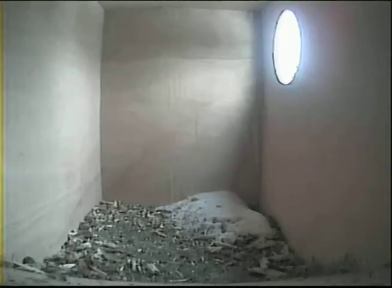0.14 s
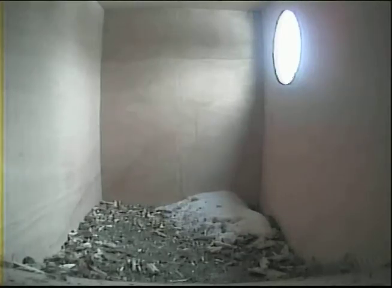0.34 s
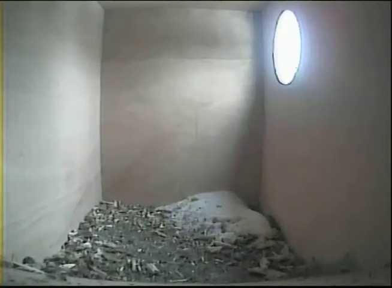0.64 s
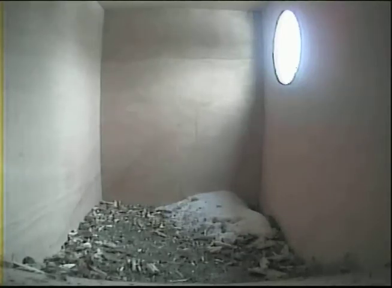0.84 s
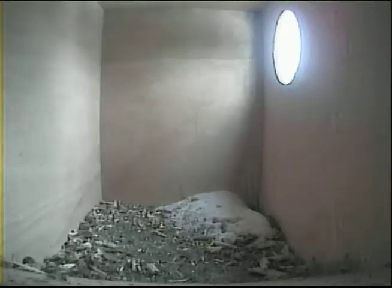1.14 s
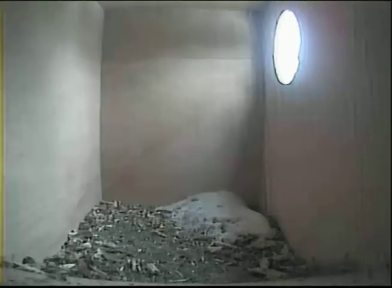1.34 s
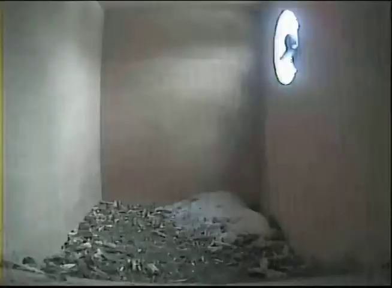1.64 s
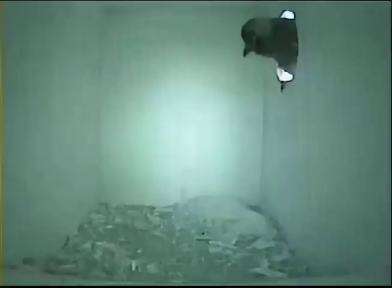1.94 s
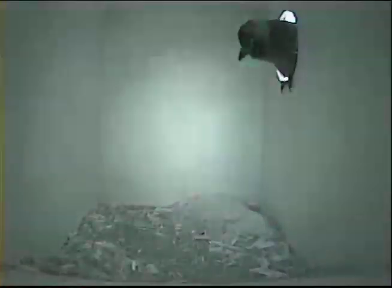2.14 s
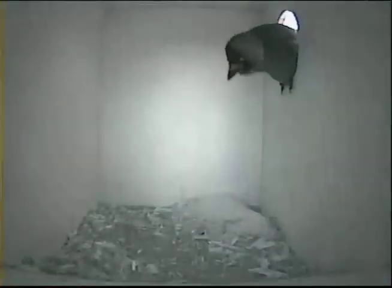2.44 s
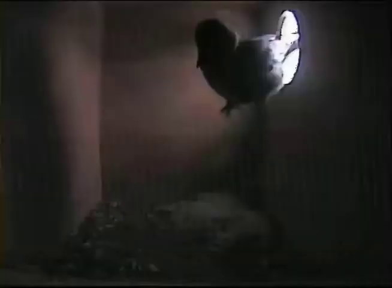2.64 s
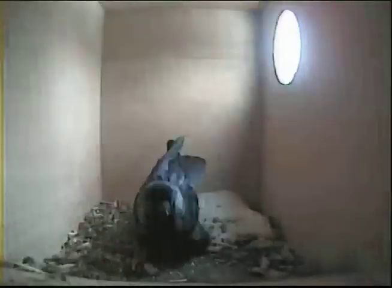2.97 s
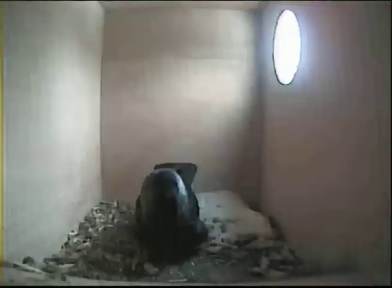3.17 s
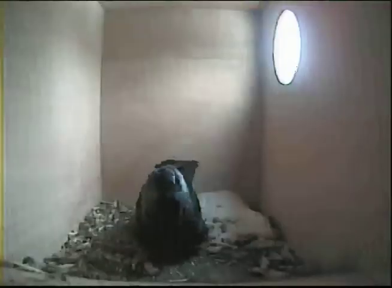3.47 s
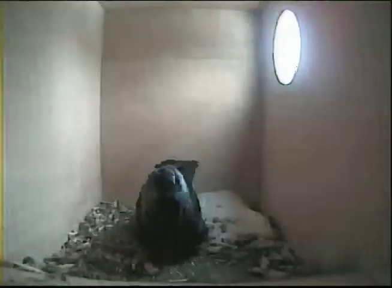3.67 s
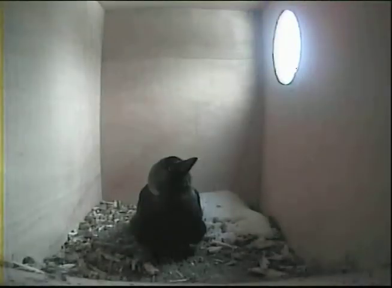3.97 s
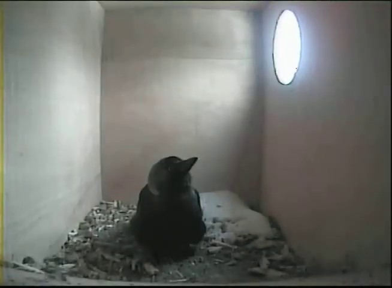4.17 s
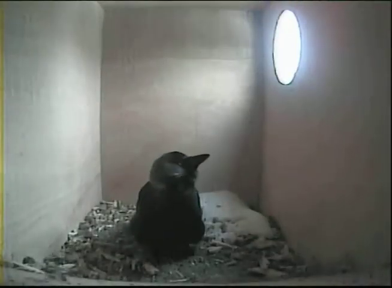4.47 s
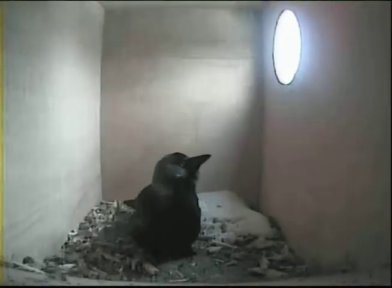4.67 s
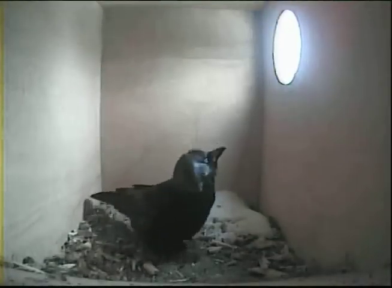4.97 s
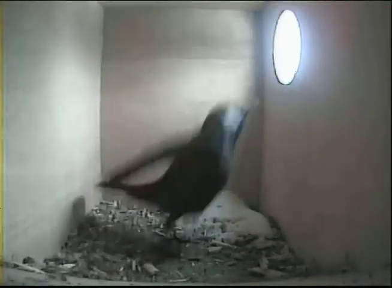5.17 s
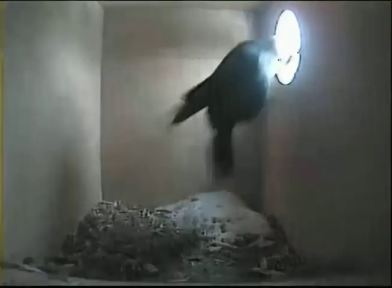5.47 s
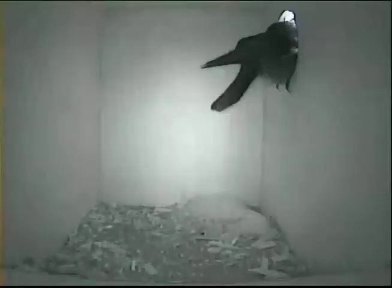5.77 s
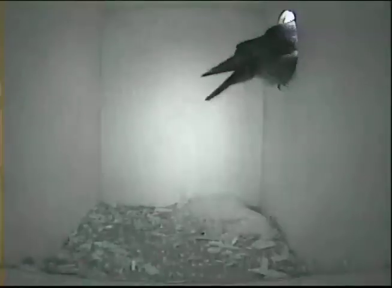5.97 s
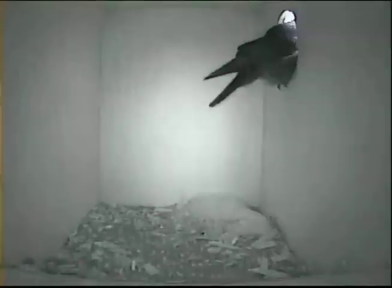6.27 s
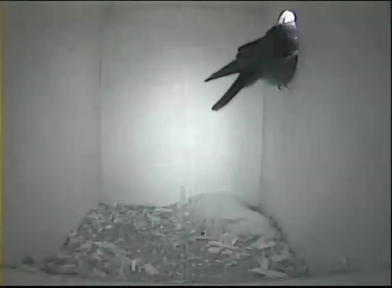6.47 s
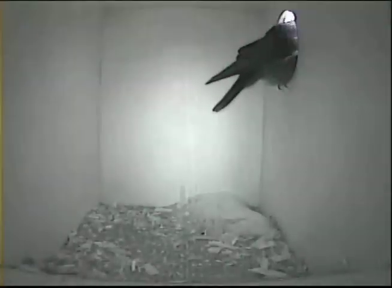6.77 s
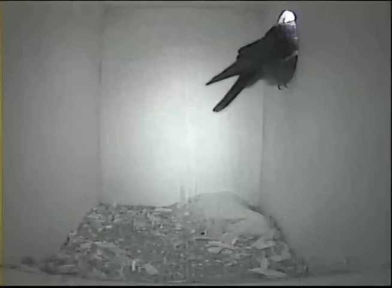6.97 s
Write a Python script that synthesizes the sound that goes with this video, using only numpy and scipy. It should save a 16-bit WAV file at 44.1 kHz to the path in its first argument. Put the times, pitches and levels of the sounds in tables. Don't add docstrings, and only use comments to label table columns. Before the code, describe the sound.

Close, low-fidelity sound in a small hollow box with hiss, faint hum and low airy pulses. One bright falling bird call comes early, then claw clicks, light knocks and litter rustle as a jackdaw climbs in and lands heavily. After an abrupt silent dropout, feet shift, wings and claws slam the boards, claws catch at the entrance, and the bird rasps once and mutters twice before settling into quiet.

```python
import sys
import numpy as np
from scipy import signal
from scipy.fft import rfft, irfft, next_fast_len
from scipy.io import wavfile
from scipy.ndimage import map_coordinates

SR = 44100
rng = np.random.default_rng(int(sys.argv[2]) if len(sys.argv) > 2 else 0)


def boost_factor(decibels):
    exponent = np.asarray(decibels, float) / 20
    return 10 ** exponent


def inscribe(sig):
    pcm = np.round(np.clip(np.atleast_2d(sig).T, -1, 1) * 32767)
    wavfile.write(sys.argv[1], SR, pcm.astype(np.int16))


N = 313551
T = np.arange(N) / SR


def unit(x):
    return x / np.sqrt(np.mean(x ** 2) + 1e-20)


def along(points, hz):
    f, v = np.transpose(points)
    return np.interp(np.log(hz + 1), np.log(f + 1), v)


def curves(rows, t=T):
    s, *columns = np.transpose(rows)
    return [np.interp(t, s, column) for column in columns]


def wobble(rate):
    knots = rng.standard_normal(int(N * rate / SR) + 4)
    return map_coordinates(knots, [T * rate])


def filtered(x, response):
    m = next_fast_len(N + SR // 2)
    return irfft(rfft(x, m) * response(np.fft.rfftfreq(m, 1 / SR)), m)[:N]


def tinted(x, spectrum):
    hz = np.fft.rfftfreq(8192, 1 / SR)[1:]
    white_rms = np.sqrt(np.mean(boost_factor(along(spectrum, hz)) ** 2))
    return filtered(x, lambda f: boost_factor(along(spectrum, f))) / white_rms


def ringing(x, modes):
    power = sum(boost_factor(2 * db) * width * np.pi / SR for _, width, db in modes)

    def response(f):
        total = 0
        for k, (centre, width, db) in enumerate(modes):
            damping = 1j * f * width
            total = total + (-1) ** k * boost_factor(db) * damping / (centre * centre - f * f + damping)
        return total

    return filtered(x, response) / np.sqrt(power)


def grit(lump_db):
    lumps = boost_factor(lump_db * np.clip(wobble(160), -2, 2))
    return unit(lumps * rng.standard_normal(N))


def swells(events, rest_db, rise, fall):
    power = boost_factor(2 * rest_db)
    for s, db, hold in events:
        early, late = np.clip(s - T, 0, None), np.clip(T - s - hold, 0, None)
        power = power + boost_factor(2 * (db - rise * early - fall * late))
    return np.sqrt(power)


# (frequency [Hz], time to fall 60 dB [s])
BOX_DECAY = [(500, 0.034), (1000, 0.14), (2050, 0.17), (3000, 0.13), (4500, 0.13), (8000, 0.091)]


def echo(x, stretch):
    hz, t, z = signal.stft(rng.standard_normal(SR // 2), SR, nperseg=128)
    decay_s = stretch * along(BOX_DECAY, hz)
    tail = signal.istft(z * boost_factor(-60 * t / decay_s[:, None]), SR, nperseg=128)[1]
    return signal.fftconvolve(x, tail / np.linalg.norm(tail))[:N]


# (frequency [Hz], density [dB per Hz])
HISS_COLOUR = [(41, -31.5), (70, 2), (81, -12), (153, -17), (173, -31.5), (253, -13), (304, -27.5),
               (482, -18.5), (707, -40.5), (847, -23), (955, -35.5), (6850, -37), (8550, -57), (11100, -77),
               (18800, -120)]
# (frequency [Hz], level [dB])
HUM_TONES = [
    (150.5, -85.5),
]


def microphone_noise():
    hum = sum(boost_factor(db + 2.5) * np.sin(2 * np.pi * hz * T) for hz, db in HUM_TONES)
    hiss = boost_factor(-76.5) * tinted(rng.standard_normal(N), HISS_COLOUR)
    return hiss + hum + .0012


# (time [s], level [dB], hold [s])
AIR_NOTES = [(.6, -59, 0.033), (.98, -58, 0.041), (1.28, -56.5, 0.034), (1.75, -58.5, .1),
             (2.05, -64, 0.16), (2.47, -58.5, .02), (2.675, -52, 0.26), (3.87, -58, 0.011),
             (4.09, -65, 0.032), (4.635, -41, 0.025), (4.74, -46.5, 0.18), (5.45, -54, 0.017),
             (5.9, -57, 0.022)]
# (time [s], level [dB], hold [s])
AIR_PUSHES = [(1.74, -49, 0.006), (1.975, -48.5, 0.0054), (2.17, -62, .005), (2.43, -63, 0.026),
              (2.67, -49, 0.0042), (4.37, -64, .005), (4.59, -49, 0.046), (5.3, -60, 0.16),
              (5.48, -52, .01), (5.91, -47, 0.0048), (6.26, -56, 0.016), (6.66, -64, 0.015),
              (7.08, -67, 0.025)]


def box_breath():
    note_hz = 53.8 * (1 + .025 * wobble(9))
    push_hz = 35 * (1 + .16 * wobble(9))
    note = np.sqrt(2) * np.sin(2 * np.pi * np.cumsum(note_hz) / SR)
    push = np.sqrt(2) * np.sin(2 * np.pi * np.cumsum(push_hz) / SR)
    note_gain = boost_factor(0.75 * wobble(22) + 2.3 * wobble(6)) * swells(AIR_NOTES, -68.5, rise=430, fall=70)
    push_gain = boost_factor(1.4 * wobble(43)) * swells(AIR_PUSHES, -68, rise=180, fall=160)
    return note_gain * note + push_gain * push


# (time [s], level [dB])
BUSTLE = [(0, -85.5), (1.0, -86.5), (1.12, -78.5), (1.56, -81), (1.7, -69), (2.11, -70.5), (2.49, -71),
          (2.63, -79.5), (3.0, -73.5), (3.9, -75), (4.43, -78), (4.6, -59), (4.74, -51.5), (5.29, -72.5),
          (5.85, -63.5), (6.15, -75.5), (6.6, -86.5), (7.1, -80.5)]
# (frequency [Hz], width [Hz], level [dB])
WALL_MODES = [(105, 29, -15.5), (218.8, 31, -6.5), (261, 18, 2), (353.5, 30, -11), (406.8, 25, -9),
              (467.2, 22, -2.5), (618.7, 20, -7.5)]
# (frequency [Hz], width [Hz], level [dB])
BOARD_MODES = [(752.6, 89, -0.5), (984, 60, 1), (1116, 60, -3), (1359, 93, -4.5), (1603, 100, -8.5)]
# (frequency [Hz], density [dB per Hz])
CLAW_COLOUR = [(900, -29), (1500, -8), (2100, -3), (2700, -4.5), (3300, -11.5), (4200, -17), (8000, -65)]
# (frequency [Hz], density [dB per Hz])
SCRATCH_COLOUR = [(2000, -22.5), (3400, -4), (4600, -3), (5600, 0.5), (7200, -4.5), (9000, -12.5)]


def rustle():
    busy_db, = curves(BUSTLE)
    above_calm_db = busy_db + 84.5
    twigs = grit(3)
    stir_db = 2.5 * wobble(18)
    shuffle = boost_factor(busy_db + stir_db) * ringing(grit(1.2), WALL_MODES)
    crackle = boost_factor(-93 + 0.78 * above_calm_db + stir_db) * ringing(twigs, BOARD_MODES)
    brush = tinted(grit(1.7), CLAW_COLOUR[:4] + SCRATCH_COLOUR[1:])
    return shuffle + crackle + boost_factor(-99 + 0.33 * above_calm_db + stir_db) * brush


def call(rows, throat, breath_db, shake, bright_db, strain_db, halves):
    on = slice(round(rows[0][0] * SR), round(rows[-1][0] * SR))
    t = T[on]
    hz, level_db, rough = curves(rows, t)
    tilt_db = bright_db + strain_db * np.log2(hz / 1000)
    rough = np.clip(rough, 0, 1)
    unsteady = 1 + (.003 + shake * rough) * wobble(260)[on]
    phase = 2 * np.pi * np.cumsum(hz * unsteady) / SR
    k = np.arange(1, 21)[:, None] / 2
    half_gain = np.where(k % 1, np.clip(halves * rough, 0, 1), 1)
    size = boost_factor(along(throat, k * hz) + tilt_db * np.log2(k)) * half_gain
    lines = size * np.sin(k * phase + rng.uniform(0, 2 * np.pi, k.shape))
    tone = np.sum(lines, axis=0) / np.sqrt(np.sum(size ** 2, axis=0) / 2)
    breathy = [(f, db + breath_db * np.log2(f / 1000)) for f, db in throat]
    air = np.zeros(N)
    air[on] = (1 + 0.49 * np.cos(phase / 2)) * rng.standard_normal(N)[on]
    air = unit(tinted(air, [(350, -57.0)] + breathy + [(9000, -87)])[on])
    edge = np.clip(np.minimum(t - t[0], t[-1] - t) / 0.0018, 0, 1)
    out = np.zeros(N)
    out[on] = edge * boost_factor(level_db) * (np.sqrt(1 - .6 * rough ** 2) * tone + .75 * rough * air)
    return out


# (time [s], pitch [Hz], level [dB], roughness [0-1])
OUTSIDE_CALL = [
    (.3525, 1350, -52.5, 0.17),
    (.358, 1190, -33.5, 0.19),
    (.366, 1149, -27.5, 0.1),
    (.376, 1115, -35, 0.1),
    (.385, 1075, -25.5, 0.14),
    (.406, 980, -34, .18),
    (.414, 940, -45, 0.02),
    (.425, 868, -43, 0.2),
    (.44, 850, -51, 0),
]
# (frequency [Hz], level [dB])
OUTSIDE_THROAT = [(600, -20.5), (1100, 3.5), (2350, -2.5), (2800, -14), (3300, -10.5), (4300, -27),
                  (7000, -32.5), (8500, -43.5)]
# (frequency [Hz], width [Hz], level [dB])
EMPTY_BOX_MODES = [(904, 12, -6), (947, 12, -2), (1001, 12, -5), (1798, 20, -4), (1890, 16, 0),
                   (1975, 16, -3), (2051, 12, -1.5), (2140, 18, -6), (2455, 11, -10), (2902, 11, -9),
                   (3305, 14, -5), (3800, 22, -4), (5800, 26, 2)]


def outside_call():
    voice = call(OUTSIDE_CALL, OUTSIDE_THROAT, 12, shake=.13, bright_db=1.0, strain_db=10.5, halves=0.091)
    return boost_factor(-1.0) * voice + boost_factor(-9) * echo(voice, .95) + boost_factor(-18.5) * ringing(voice, EMPTY_BOX_MODES)


# (time [s], pitch [Hz], level [dB], length [s])
SONGBIRD_NOTES = [
    (0.939, 3810, -93, .02),
    (0.978, 3530, -88, 0.031),
    (0.994, 4140, -89, .03),
]


def songbird():
    out = np.zeros(N)
    for s, hz, db, length in SONGBIRD_NOTES:
        out += boost_factor(db) * np.exp(-((T - s) / length) ** 2 * 4) * np.sin(2 * np.pi * hz * T)
    return out


# (time [s], peak [dB], length [s])
CLAW_GRIPS = [(1.1196, -73.5, 0.04), (1.258, -64, 0.018), (1.7265, -46, 0.014), (1.757, -49, 0.026),
              (2.199, -64, 0.012), (2.2956, -52.5, 0.007), (2.313, -57, 0.027), (2.477, -50.5, 0.033),
              (2.5375, -48, 0.02), (2.585, -56, 0.02), (2.842, -52, 0.028), (4.5625, -33.5, 0.019),
              (4.578, -37.5, 0.024), (4.735, -55.5, 0.025), (5.447, -36.5, 0.012), (5.564, -62, 0.029),
              (5.655, -57, 0.023)]
# (time [s], peak [dB], length [s])
FOOTSTEPS = [(1.1725, -64, 0.042), (1.5175, -55, 0.025), (1.598, -57, 0.026), (1.904, -66, 0.023),
             (1.958, -69, 0.029), (2.0415, -61.5, 0.029), (2.323, -63.5, 0.061), (2.413, -54, 0.027),
             (2.378, -61, 0.017), (2.517, -55, 0.012), (2.962, -51, 0.036), (3.1843, -62.5, 0.042),
             (4.003, -56.5, 0.037), (4.1916, -54, 0.019), (4.369, -59.5, 0.063), (4.434, -52.5, 0.037),
             (4.4984, -45.5, 0.021), (4.6015, -34, 0.013), (4.627, -49, 0.027), (4.664, -50, 0.058),
             (4.756, -49, 0.016), (4.792, -49, 0.035), (4.864, -48, 0.034), (4.8793, -58, 0.018),
             (4.9384, -58, 0.086), (5.497, -45.5, 0.03), (7.04, -63, 0.029)]
# (time [s], peak [dB], length [s])
BODY_THUMPS = [(1.254, -55.5, 0.027), (1.351, -68.5, 0.018), (1.559, -62.5, 0.019), (1.6395, -62, 0.021),
               (1.6526, -60, 0.015), (1.832, -67, 0.029), (1.982, -58, 0.025), (1.9945, -58, 0.023),
               (2.37, -59, 0.016), (2.441, -62.5, 0.027), (2.795, -52.5, 0.015), (2.8125, -58.5, 0.028),
               (2.908, -62, 0.021), (3.212, -66.5, 0.029), (3.852, -67, 0.06), (5.15, -68.5, .04),
               (4.051, -53.5, 0.022), (4.9905, -61.5, 0.03), (5.039, -58.5, 0.027), (5.2396, -61.5, 0.025),
               (5.4678, -44, 0.014), (6.03, -62.5, 0.053), (6.335, -69, 0.019)]
# (time [s], peak [dB], length [s])
SKIDS = [(1.727, -59, 0.01), (2.084, -68, .005), (2.1004, -67, 0.013), (2.114, -72, .02),
         (2.3705, -66, .008), (2.415, -66, 0.012), (2.442, -65, 0.014), (5.571, -66, .006),
         (2.6, -66.5, 0.054), (2.765, -67.5, 0.02), (2.845, -58.5, 0.016), (4.575, -54.5, 0.031),
         (4.8, -71.5, 0.049), (5.446, -63, 0.009), (2.794, -41, 0.011), (4.87, -62, 0.017),
         (5.043, -71, 0.023), (5.098, -70, 0.029), (5.147, -71, 0.019), (5.2396, -70.5, 0.034),
         (5.29, -63.5, 0.075), (5.69, -69.5, .02), (5.7219, -72, 0.024)]


def knocks():
    thud, knock, claw, scratch = np.zeros((4, N))
    # (thud, claw, scratch) [dB over the knock]
    kinds = [(BODY_THUMPS, (8.8, -16.5, -28.5)), (FOOTSTEPS, (1, -22, -35.5)),
             (CLAW_GRIPS, (0, -7, -25)), (SKIDS, (-12, -6.5, -4))]
    for rows, (thud_db, claw_db, scratch_db) in kinds:
        for s, db, length in rows:
            start = round(s * SR)
            t = T[:SR // 4][:N - start]
            on = slice(start, start + len(t))
            drag = np.exp(-(t / max(length, .003)) ** 1.24)
            thud[on] += boost_factor(db + thud_db) * (1 - np.exp(-t / .003)) * drag
            knock[on] += boost_factor(db) * (1 - np.exp(-t / 0.0047)) * drag
            claw[on] += boost_factor(db + claw_db) * (1 - np.exp(-t / 0.005)) * drag
            scratch[on] += boost_factor(db + scratch_db) * (1 - np.exp(-t / 0.0016)) * drag
    chips = grit(2.8)
    scrape = boost_factor(-9.0) * tinted(claw * chips, CLAW_COLOUR)
    scrape += boost_factor(-6.5) * tinted(scratch * chips, SCRATCH_COLOUR)
    walls = ringing(thud * grit(0.56), WALL_MODES)
    boards = boost_factor(-9.5) * ringing(knock * grit(1.5), BOARD_MODES)
    return walls + boards + scrape + boost_factor(-4.0) * echo(scrape, 0.69)


# (time [s], pitch [Hz], level [dB], hold [s])
TWIG_BUZZES = [(1.121, 1536, -88, 0.094), (1.26, 2770, -83.5, 0.025), (1.263, 1570, -78, .015),
               (1.522, 1410, -78, 0.017), (1.658, 2760, -87, 0.018), (1.728, 4510, -75.5, 0.045),
               (1.728, 3330, -72, 0.015), (1.82, 1480, -81.5, .03), (2.797, 3900, -68, .025),
               (2.845, 1550, -62, .02), (2.964, 2550, -76, .012), (2.964, 1600, -70, 0.023),
               (4.006, 1630, -75.5, .015), (4.054, 2170, -78, 0.011), (4.196, 1560, -76, 0.011),
               (4.381, 1050, -72.5, .02), (4.443, 1540, -76, 0.016), (4.452, 675.7, -67.5, 0.027),
               (4.504, 1540, -67, .016), (4.594, 1323, -50.5, 0.026), (4.941, 1395, -70, 0.056),
               (5.499, 1620, -63.5, 0.0051), (5.726, 887, -67.5, 0.03)]


def twangs():
    scrape = grit(1.5)
    out = np.zeros(N)
    for s, hz, db, hold in TWIG_BUZZES:
        gain = swells([(s, db, hold)], -150, rise=2500, fall=730)
        out += gain * ringing(scrape, [(hz, hz / 9, 0)])
    return out


# (time [s], peak [dB], pitch [Hz])
CLAW_TICKS = [(1.2579, -64, 1580), (1.5243, -63, 1490), (1.5637, -72, 1590), (1.6056, -71, 1600),
              (1.626, -70, 1600), (1.651, -71, 1640), (1.7268, -48, 1670), (1.7567, -56, 1600),
              (1.9135, -67, 1680), (1.956, -69, 1670), (1.9774, -62, 1450), (1.9994, -61, 1450),
              (2.0443, -67, 1460), (2.0817, -59, 1670), (2.099, -59, 2080), (2.1134, -63, 2440),
              (2.1334, -65, 2290), (2.162, -69, 2020), (2.1984, -68, 2150), (2.2956, -60, 1600),
              (2.3108, -61, 2100), (2.3271, -63, 2100), (2.3695, -60, 1470), (2.4139, -58, 1480),
              (2.4413, -60, 1450), (2.4578, -59, 1480), (2.4762, -50, 1630), (2.5211, -57, 1930),
              (2.5366, -43, 1660), (2.5895, -58, 2000), (2.9714, -66, 1570), (4.0562, -61, 1490),
              (4.4388, -62, 1500), (4.5057, -52, 1580), (4.5627, -34, 1670), (4.5796, -36, 1670),
              (4.6016, -39, 1450), (5.0434, -63, 2300), (5.2504, -69, 1770), (5.3062, -62, 1470),
              (5.4449, -43, 2090), (5.4618, -47, 2140), (5.5707, -64, 1610), (5.5896, -63, 1450),
              (5.657, -62, 1700), (5.667, -61, 1700), (5.689, -61, 1580), (5.7213, -66, 2230)]


def ticks():
    out, t = np.zeros(N), T[:SR // 200]
    for s, db, hz in CLAW_TICKS:
        tone = np.sin(2 * np.pi * hz * (1.2 * t - 110 * t * t))
        shape = (1 - np.exp(-t / .0002)) * np.exp(-t / .0007)
        out[round(s * SR):][:len(t)] += boost_factor(db + 7.5) * shape * tone
    return out + boost_factor(-8) * ringing(out, BOARD_MODES) + boost_factor(-6) * echo(out, 0.4)


# (time [s], pitch [Hz], peak [dB], hold [s])
PANEL_SLAMS = [(3.1, 190, -44.5, .012), (2.822, 237, -40, 0.028), (2.80, 452, -48, .025),
               (2.797, 673, -52, 0.043), (4.562, 270, -37, 0.0081), (4.563, 480, -37.5, 0.04),
               (4.603, 258, -34, 0.036), (4.875, 258, -51, 0.026), (4.5, 470, -47, .02),
               (4.605, 608, -35.5, 0.022), (6.03, 248, -55, 0.064), (6.04, 430, -58, 0.0197),
               (6.36, 250, -70, .08), (1.74, 600, -60, .03), (2.003, 470, -54, .025)]


def slams():
    sway = np.cumsum(1 + .02 * wobble(40)) / SR
    out = np.zeros(N)
    for s, hz, db, hold in PANEL_SLAMS:
        out += swells([(s, db, hold)], -150, rise=4700, fall=800) * np.sin(2 * np.pi * hz * sway)
    return out


# (time [s], pitch [Hz], level [dB], roughness [0-1])
HARSH_CALL = [
    (5.766, 1485, -59, 0.03),
    (5.783, 1480, -36.5, 0),
    (5.795, 1200, -40.5, .75),
    (5.808, 1364, -36, 1.1),
    (5.822, 1183, -41.5, 0.6),
    (5.836, 1066, -41.5, 0.44),
    (5.86, 940, -46.5, 0.7),
    (5.88, 855, -54.5, 1.1),
    (5.89, 787, -81, 1),
]
# (frequency [Hz], level [dB])
OPEN_BEAK = [(600, -8), (1060, 2), (2200, 2), (3150, -5.5), (3650, -20.5), (5100, -28), (5800, -15),
             (7000, -10.5), (7600, -37), (8500, -30)]


def harsh_call():
    voice = call(HARSH_CALL, OPEN_BEAK, .1, shake=0.027, bright_db=-0.46, strain_db=-4, halves=0.54)
    return boost_factor(-1.0) * voice + boost_factor(-5.5) * echo(voice, 0.86)


# (time [s], pitch [Hz], level [dB], roughness [0-1])
MUTTERED_CALLS = [
    [(5.932, 1057, -48, 0.1), (5.939, 1017, -32.5, 0.05), (5.961, 992, -33.5, 0.07),
     (5.965, 930, -41.5, 0.1), (5.97, 858, -36, 0), (5.979, 724, -53, 0), (5.997, 597, -49.5, 0)],
    [(6.025, 836, -42.5, 0.09), (6.036, 913, -42, 0.15), (6.048, 908, -38.5, 0.01),
     (6.062, 841, -44.5, 0.08), (6.07, 800, -49, 0.24), (6.095, 856, -63, 0)],
]
# (frequency [Hz], level [dB])
HALF_SHUT_BEAK = [(600, -12.5), (1000, -2), (1830, -2), (2050, -9), (3050, -1), (3600, -16.5),
                  (6000, -16.5), (8000, -29)]


def muttered_calls():
    voice = np.zeros(N)
    for rows in MUTTERED_CALLS:
        voice += call(rows, HALF_SHUT_BEAK, -9, shake=0.19, bright_db=-15.0, strain_db=-1.0, halves=.2)
    return boost_factor(-5.0) * voice + boost_factor(-11) * echo(voice, .6)


# (frequency [Hz], level [dB])
MIC_EDGE = [(7200, -1), (7650, -6.5), (7900, -28), (8250, -14.5), (8700, -16)]


def scene():
    air = box_breath() + rustle()
    voices = outside_call() + songbird() + harsh_call() + muttered_calls()
    blows = knocks() + twangs() + ticks() + slams()
    return filtered(air + voices + blows, lambda f: boost_factor(along(MIC_EDGE, f)))[None]


def band_limit(x):
    return signal.sosfilt(signal.butter(12, 8700, fs=SR, output="sos"), x)


# (start [s], end [s])
LINK_GAP = (3.3293, 3.8498)


def record(dry):
    live = (T < LINK_GAP[0]) | (T > LINK_GAP[1])
    mix = (dry + microphone_noise()) * live
    return band_limit(mix)


dry = scene()
out = record(dry)
inscribe(out)
```